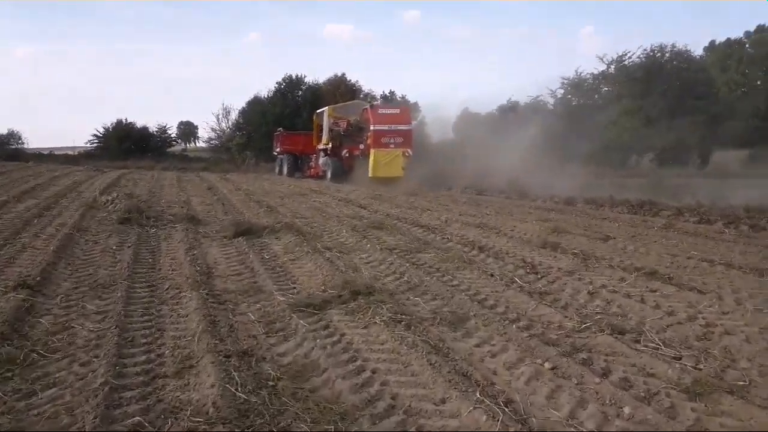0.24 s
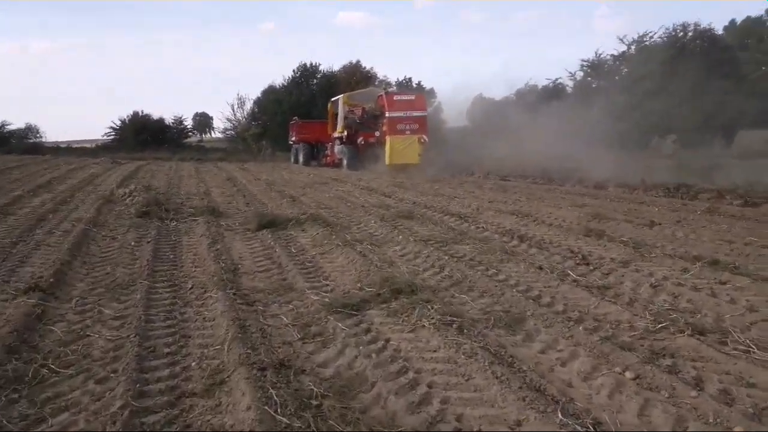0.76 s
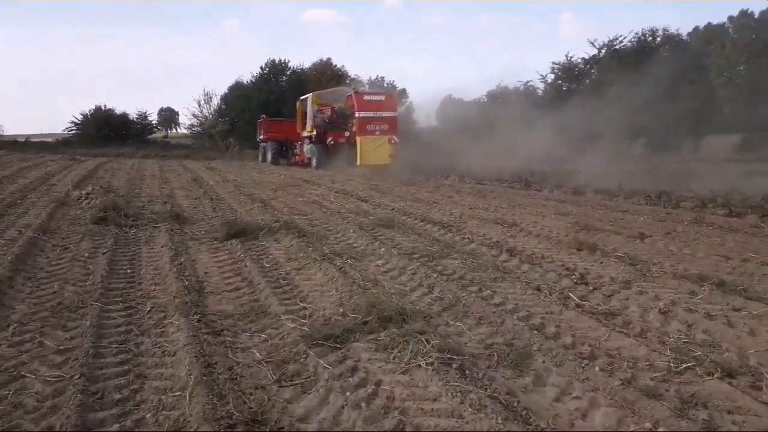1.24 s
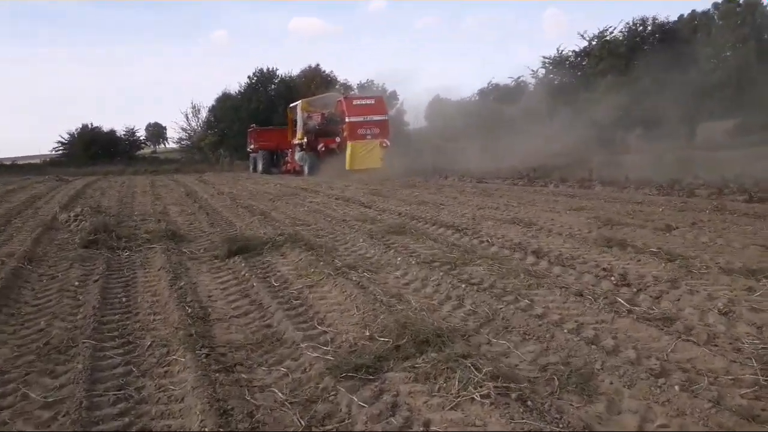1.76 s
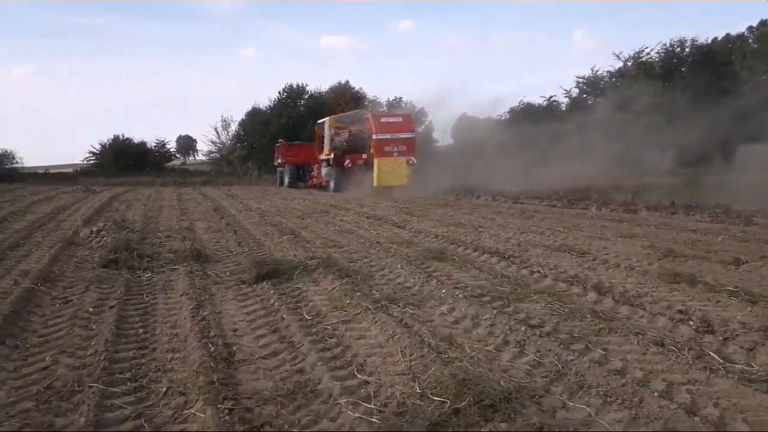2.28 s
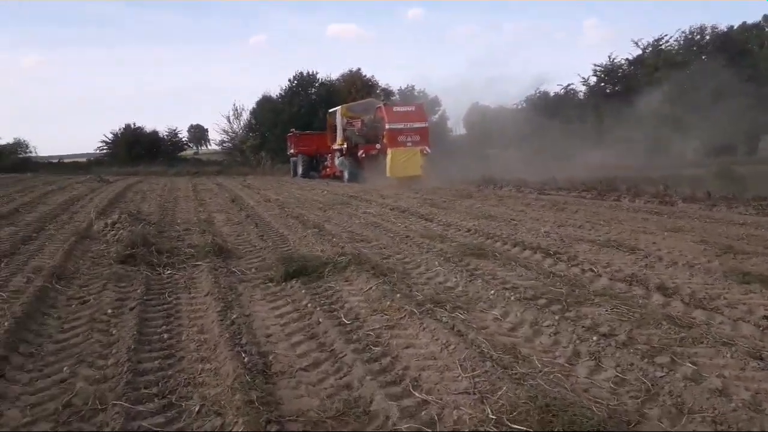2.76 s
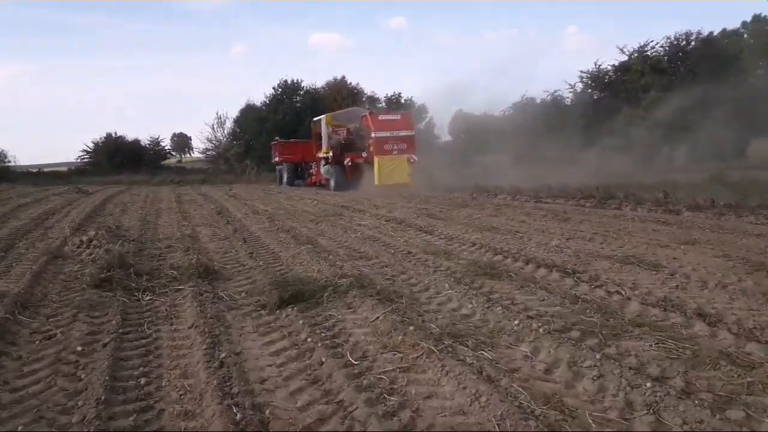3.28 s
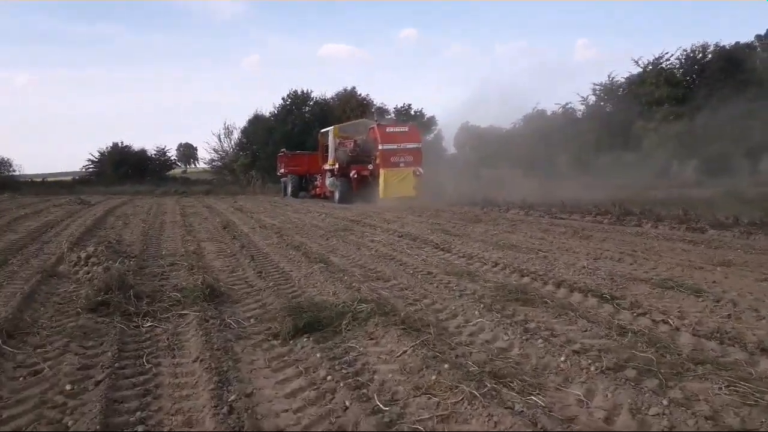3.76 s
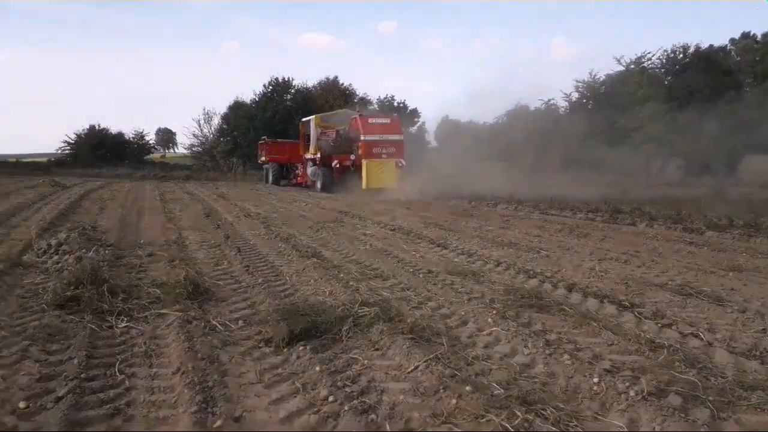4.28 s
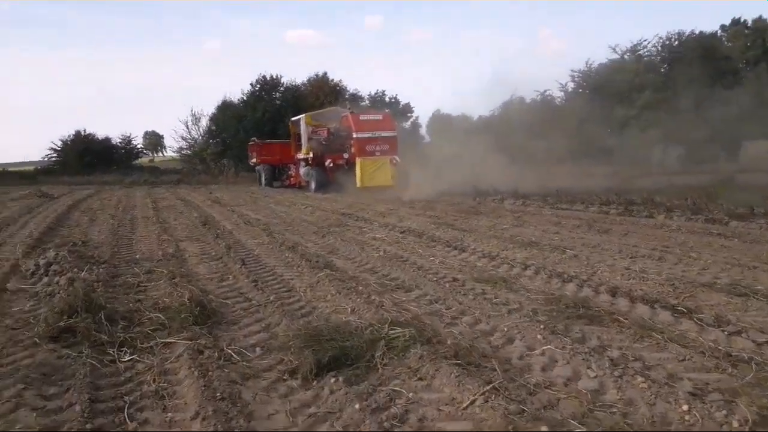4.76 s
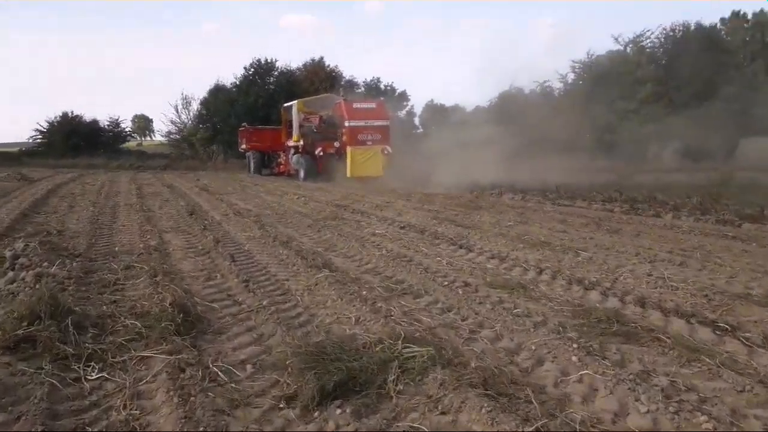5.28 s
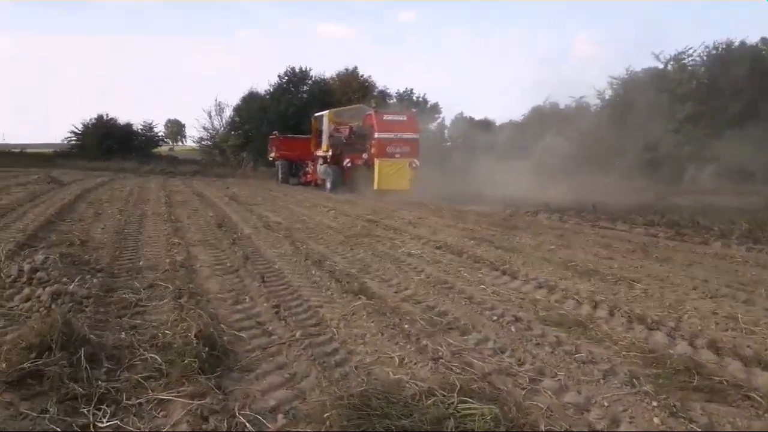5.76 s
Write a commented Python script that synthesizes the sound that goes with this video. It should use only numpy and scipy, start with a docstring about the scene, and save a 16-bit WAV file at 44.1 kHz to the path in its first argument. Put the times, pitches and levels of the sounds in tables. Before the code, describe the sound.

Steady metallic clatter and hissing soil from a harvester over a low engine drone, with stones crashing and irregular wind thumps on the microphone.

```python
"""A low engine drone and a steel rattle run throughout: a tractor pulls a potato harvester over a dry field.
The drone is shaped noise and unsteady tones; the rattle and hissing soil are random impacts and short rings.
Stones and clods crash through the frame, panels knock, a bar rings and a roller squeaks, from noise and modes.
Gusts of eddies thump on the microphone; dry straws rustle as high noise and a stalk snaps in brief rings."""
import sys
import numpy as np
from scipy import signal
from scipy.fft import rfft, irfft, next_fast_len
from scipy.io import wavfile
from scipy.ndimage import map_coordinates

SR = 44100
rng = np.random.default_rng(int(sys.argv[2]) if len(sys.argv) > 2 else 0)


def put_to_file(sound):
    """Save the sound as 16-bit audio at rate SR, in the file named by the first command-line argument."""
    columns = np.atleast_2d(sound).T  # one column per channel
    safe = np.clip(columns, -1, 1)
    whole_steps = np.round(safe * 32767)
    wavfile.write(sys.argv[1], SR, whole_steps.astype(np.int16))


N = 265614  # length in samples

# Strength of the wind between gusts: t/s, level/dB
BREEZE = [(0, -41), (.3, -53), (.55, -25), (.78, -24.5), (.9, -33.5), (1.45, -40.5), (1.7, -31.5),
          (2.4, -28.5), (2.7, -36), (3.05, -27), (3.45, -33.5), (3.75, -23), (4.3, -25.5), (4.62, -41),
          (4.8, -27.5), (4.95, -33.5), (5.8, -31.5), (6.02, -24.5)]
# Gusts, all rising and falling alike: peak t/s, hold/s, level/dB
GUSTS = [(0.44, 0.029, -16.5), (0.656, 0.018, -17.5), (1.559, 0.055, -23), (2.904, 0.053, -11.5),
         (3.59, 0.033, -9), (5.61, 0.021, -22.5)]
# Brief flurries within the wind: t/s, level/dB
FLURRIES = [(.415, -24.5), (.478, -15), (.558, -17.5), (.68, -24), (.782, -25), (1.035, -22.5),
            (1.568, -22), (1.612, -18), (1.665, -20), (2.29, -21.5), (2.83, -22.5), (2.915, -14),
            (3.0, -19.5), (3.045, -21), (3.62, -13), (3.685, -22.5), (3.881, -23), (3.95, -22.5),
            (4.035, -21), (4.095, -23), (4.17, -25), (4.21, -22), (4.27, -20), (4.312, -23), (4.375, -26.5),
            (4.446, -22.5), (4.485, -21.5), (4.53, -23), (4.665, -22), (4.695, -23), (4.73, -23.5),
            (5.065, -25), (5.655, -22)]
# Lone eddies that pop on the microphone: t/s, f/Hz, level/dB
POPS = [(.463, 225, -8), (.485, 170, -10), (0.664, 214, -8), (.728, 450, -13.5), (0.761, 219, -8),
        (1.04, 128, -13.5), (1.604, 370, -13), (1.675, 373, -10.5), (1.777, 231, -15.5), (1.885, 207, -11),
        (2.2, 194, -10.5), (2.828, 214, -14.5), (3.155, 173, -11.5), (3.608, 367, -2.5), (3.699, 460, -9.5),
        (3.785, 240, -9), (3.999, 188, -12.5), (4.089, 228, -12), (4.203, 149, -10.5), (4.279, 276, -13),
        (4.589, 159, -14.5), (5.273, 147, -17), (5.349, 247, -15), (5.614, 260, -9)]
# Colour of the large and the small eddies: f/Hz, level/dB per Hz
BIG_EDDY_SPECTRUM = [(20, -18), (40, -14), (65, -4), (95, 4), (160, 5.5), (250, -2.5), (400, -10),
                     (600, -17.5), (1000, -33), (3000, -83)]
SMALL_EDDY_SPECTRUM = [(80, -9), (200, 4), (350, 2.5), (520, -1.5), (700, -8), (1000, -16), (1500, -36),
                       (4000, -102)]
# Stubble rustling near the microphone: t/s, centre f/Hz, level/dB
RUSTLES = [(0.711, 11900, -56), (1.322, 12000, -57), (4.792, 13800, -53.5)]
# Dry stalks snapping near the microphone: t/s, level/dB
SNAPS = [(3.7377, -9), (5.9445, -31)]
# Resonances of a stalk: f/Hz, width/Hz, level/dB
STALK_MODES = [(1800, 1700, -12), (4200, 1600, -14), (6450, 1150, 1), (10700, 1600, -23),
               (13350, 1100, -11)]
# Engine and drive tones: mean f/Hz, mean level/dB
ENGINE_TONES = [(129, -45.5), (667, -49), (1122, -50)]
# Colour of the exhaust drone: f/Hz, level/dB per Hz
DRONE_SPECTRUM = [(25, -45), (45, -8.5), (65, 4), (130, 1), (250, 2), (340, -7), (450, -19.5), (700, -40.5),
                  (2000, -77)]
# Squeaks of a dry roller: t/s, length/s, f/Hz, level/dB, upper mode's level/dB
SQUEAKS = [(1.152, .072, 2065, -36, -15), (3.135, .16, 2050, -40, -24)]
# Blows that ring a steel bar: t/s, level/dB, f/Hz that the struck spot favours
BAR_BLOWS = [(.15, -44, 3300), (.585, -45, 3300), (1.887, -49, 3350), (1.98, -46, 3330), (2.97, -50, 3350),
             (3.625, -43.5, 3250), (4.985, -42, 2950), (5.055, -47, 3400)]
# Modes of the bar: f/Hz, level/dB, time to fall 60 dB/s
BAR_MODES = [(2589, -5, .22), (2907, 1, 1.3), (3200, -3, .4), (3338, -4, .35), (3440, 0, .22),
             (3798, -3, .25), (4237, 0, .5)]
# Single stones that knock a hollow panel: t/s, f/Hz, level/dB of that pitch, level/dB of the panel's ring
KNOCKS = [(.156, 1367, -19, -33), (1.524, 1520, -24, -39), (1.729, 1400, -21, -46), (1.759, 1300, -27, -45),
          (1.878, 744, -23, -35), (1.981, 1110, -16, -28.5), (1.996, 1230, -28, -33.5),
          (2.009, 1580, -16.5, -31.5), (2.198, 1740, -23, -35), (2.232, 1760, -20, -25),
          (2.303, 1430, -19, -41), (3.3, 1800, -20.5, -29), (3.325, 1330, -17, -30.5),
          (4.554, 1180, -28, -29), (4.561, 1250, -21, -25.5), (4.57, 1298, -17, -38.5),
          (5.429, 1128, -28, -31), (5.46, 732, -22, -40), (5.475, 1254, -17.5, -29.5)]
# Modes of the panel: f/Hz, level/dB, time to fall 60 dB/s
PANEL_MODES = [(715, -3, .11), (1285, -3, .06), (2030, -6, .08), (2300, -7, .08), (2940, -15, .07),
               (3300, -19, .06), (4170, -21, .08), (4900, -20, .08), (5945, -18, .08)]
# Colour of a stone's contact with the panel: f/Hz, level/dB per Hz
CONTACT_SPECTRUM = [(400, -14), (750, -1), (1300, 0), (2200, -4), (2700, -13), (4000, -15), (6000, -10),
                    (7300, -16), (8500, -45)]
# Stones and clods tumbling through the machine: t/s, length/s, stones' level/dB, earth's level/dB
CRASHES = [(0.086, 0.033, -29.5, -63), (0.141, 0.027, -30.5, -38.5), (0.572, 0.046, -23, -39.5),
           (1.028, 0.024, -32, -63), (1.314, 0.038, -57, -42.5), (1.413, 0.012, -32, -50),
           (1.508, 0.034, -27.5, -45), (1.726, 0.015, -27.5, -54), (1.867, 0.048, -23.5, -41),
           (1.971, 0.044, -23.5, -36), (2.189, 0.061, -22, -32.5), (2.287, 0.044, -28, -38),
           (2.456, 0.13, -31.5, -49), (2.616, 0.057, -37, -46), (3.294, 0.054, -24, -41.5),
           (3.797, 0.055, -22.5, -33.5), (4.55, 0.015, -28.5, -57), (4.707, 0.028, -30.5, -50),
           (4.748, 0.055, -31, -53), (4.863, 0.012, -44, -42), (4.979, 0.055, -26.5, -48),
           (5.042, 0.058, -29, -47), (5.424, 0.044, -25, -39.5), (5.59, 0.0084, -35, -68)]
# Colour of the battered frame, the spraying grit and the earth's thud: f/Hz, level/dB per Hz
FRAME_SPECTRUM = [(250, -31), (480, -12.5), (620, -3), (780, -1.5), (930, -7), (1130, 0.5), (1400, 1),
                  (1750, -2.5), (2200, -11.5), (2600, -24.5), (3300, -33), (4000, -30.5), (7000, -20.5),
                  (9000, -73)]
GRIT_SPECTRUM = [(1500, -61), (3000, -3.5), (4200, -10), (5300, -1.5), (6500, 6), (7200, 5), (8200, -16),
                 (9500, -24), (11500, -25), (13000, -63), (16000, -48)]
THUD_SPECTRUM = [(30, -58), (70, -36), (120, 5.5), (180, 4), (300, -1), (450, -13.5), (1000, -88)]
# How hard the sieve web rattles under its load: t/s, level/dB
WEB_LOAD = [(0.0, -37.5), (0.35, -31.5), (1.39, -34.5), (1.83, -31.5), (2.09, -31.5), (3.0, -32),
            (3.92, -28.5), (4.54, -31.5), (5.21, -32.5), (6.02, -31.5)]
# Soil that the web tips out once a lap, lap by lap: level/dB
LAP_SPILLS = [-38.5, -41.5, -47, -47.5, -42]
# Colour of the web's rods and of the soil: f/Hz, level/dB per Hz
WEB_SPECTRUM = [(250, -9.5), (480, -15), (650, -4.5), (800, -5.5), (930, -9.5), (1130, -4), (1400, -3),
                (1800, -9.5), (2150, -15.5), (2600, -25), (3200, -27), (4000, -33.5), (7000, -26.5),
                (9000, -65)]
SOIL_SPECTRUM = [(1500, 5.5), (3000, -11), (4200, -11), (5300, -3), (6500, 0.5), (7200, -3.5),
                 (8100, -20.5), (9000, -17.5), (11000, -14), (12300, -22.5), (14500, -37), (16000, -35)]

FLUTTER_DB, FLUTTER_PER_S = .9, 14  # unsteadiness of the breeze
GUST_RISE_DB_PER_S, GUST_FALL_DB_PER_S = 236, 141
FLURRY_S = .016  # half width of a flurry
POP_CYCLES, POP_CALM_CYCLES = 0.57, 1.4  # half widths of a pop and of the lull around it
SNAP_SWELL_S = .00055  # from the start of a snap to its peak
UPPER_MODE = 1.31  # multiple of the roller's pitch
BAR_BUZZ_RAD = .28  # the loose bar chatters in its seat, which roughens its ring
SPOT_DB, SPOT_HZ = 9, 500  # modes this far or farther from the favoured pitch are this much weaker
CONTACT_DB, CONTACT_T60_S = -5, .08  # level relative to the panel's ring, and time to fall 60 dB
PANEL_RISE_S = .0012  # the ring takes a moment to spread over the panel
THUD_DB, FULL_LOAD_S = 11, 0.045  # thud relative to the earth's spray; shorter loads thud less
RATTLE_DB, TRICKLE_DB = -1, -21.5  # rods and steady trickle of soil, relative to the load
FIRST_SPILL_S, LAP_S = -0.42, 1.412
SPILL_RISE_S, SPILL_HOLD_S, SPILL_T60_S = 0.07, 0.34, 1.54
SPILL_RATTLE_DB = 2.5  # extra rattle of the rods, relative to the spill
LOW_CUT_HZ, TOP_HZ = 34, 15700  # the band that the microphone passes


def amp(db):
    """Turn decibels into a gain."""
    return np.exp(np.maximum(db, -300) * (np.log(10) / 20))


def unit(x):
    """Scale to rms 1."""
    return x / np.sqrt(np.mean(x ** 2) + 1e-20)


def clock():
    """The time of each sample in seconds."""
    return np.arange(N) / SR


def curves(rows):
    """Join the points of each column after the time by straight lines."""
    s, *columns = np.transpose(rows)
    return [np.interp(clock(), s, column) for column in columns]


def wobble(rate):
    """A smooth random curve with this many random points a second."""
    return map_coordinates(rng.standard_normal(4096), [clock() * rate], mode="wrap")


def filtered(x, response):
    """Multiply the spectrum of x by a response that depends on frequency."""
    size = next_fast_len(N + SR // 2)
    hz = np.fft.rfftfreq(size, 1 / SR)
    return irfft(rfft(x, size) * response(hz), size)[:N]


def coloured(x, spectrum):
    """Shape x by a table of frequencies and levels, at rms 1."""
    f, db = np.transpose(spectrum)
    return unit(filtered(x, lambda hz: amp(np.interp(np.log(hz + 1), np.log(f), db))))


def rush(spectrum):
    """Coloured noise of rms 1."""
    return coloured(rng.standard_normal(N), spectrum)


def contacts(rate, spread_db):
    """Random impacts of unequal size, rate a second on average."""
    chance, size, sign = rng.random(N), rng.standard_normal(N), rng.choice([-1, 1], N)
    struck = chance < rate / SR
    return unit(struck * sign * amp(spread_db * np.clip(size, -2, 2)))


def ringing(x, t60, ring_db):
    """Each impact is a crack and a dying noisy ring, new each time as it strikes another spot."""
    keep = amp(-60 / (t60 * SR)) ** 2  # share of the energy left after one sample
    energy = signal.lfilter([1 - keep], [1, -keep], x ** 2)
    return unit(x + amp(ring_db) * np.sqrt(energy) * rng.standard_normal(N))


def clinks(rate, centre_hz, scatter, t60, spread_db):
    """Short steel rings at random times, each with its own pitch and size."""
    when, pitch, size = rng.standard_normal((4096, 3)).T[:, :, None]
    start = np.abs(np.arange(len(when))[:, None] + 3 * when) / rate
    heard = start[:, 0] < N / SR
    t = np.arange(SR // 20) / SR
    hz = centre_hz * np.exp(scatter * pitch[heard])
    loudness = amp(spread_db * np.clip(size[heard], -2, 2))
    rings = loudness * amp(-60 * t / t60) * np.sin(2 * np.pi * hz * t)
    at = (start[heard] * SR).astype(int) + np.arange(len(t))
    return unit(np.bincount(at.ravel(), rings.ravel(), N)[:N])


def tumble(start, length, rise, t60):
    """The strength of a load that lands, keeps tumbling for a while, then settles."""
    t = clock() - start
    live = (t > 0) & (t < length + t60)
    landing = np.minimum(t[live] / rise, 1)
    settling = amp(-60 * np.maximum(t[live] - length, 0) / t60)
    out = np.zeros(N)
    out[live] = landing * settling
    return out


def gust(peak, hold):
    """A gust builds quickly, holds a moment and dies away more slowly."""
    t = clock() - peak
    return amp(GUST_RISE_DB_PER_S * np.minimum(t, 0) - GUST_FALL_DB_PER_S * np.maximum(t - hold, 0))


def eddies(spectrum, rate, spread_db, wash_db):
    """Separate pressure thumps at uneven intervals, on a turbulent wash."""
    slip, size, sign = rng.standard_normal((4096, 3)).T
    at = ((np.arange(len(slip)) + 0.3535 * slip) / rate * SR).astype(int)
    inside = (at >= 0) & (at < N)
    push = np.sign(sign) * amp(spread_db * np.clip(size, -2, 2))
    thumps = np.bincount(at[inside], push[inside], N)
    # the low part of each thump arrives a little late, so the pressure swings to and fro
    swung = filtered(unit(thumps), lambda hz: ((1 - 1j * hz / 220) / (1 + 1j * hz / 220)) ** 2)
    return coloured(swung + amp(wash_db) * rng.standard_normal(N), spectrum)


def wind():
    """Eddies buffet the microphone; strong gusts put their extra force into smaller, faster ones."""
    wind_db, = curves(BREEZE)
    breeze = amp(wind_db + FLUTTER_DB * wobble(FLUTTER_PER_S))
    gust_energy = sum((amp(db) * gust(s, hold)) ** 2 for s, hold, db in GUSTS)
    flurry_energy = sum(amp(db) ** 2 * np.exp(-((clock() - s) / FLURRY_S) ** 2) for s, db in FLURRIES)
    force = np.sqrt(breeze ** 2 + gust_energy + flurry_energy)
    fast = force / np.hypot(force, amp(-13.5))  # share of the small eddies
    slow = np.sqrt(1 - fast ** 2)
    big = eddies(BIG_EDDY_SPECTRUM, rate=85, spread_db=1.3, wash_db=-3)
    small = eddies(SMALL_EDDY_SPECTRUM, rate=210, spread_db=1.3, wash_db=-2)
    return force * (amp(-0.5) * slow * big + amp(-2.5) * fast * small)


def pops(turbulence):
    """A lone eddy pushes the turbulence aside and swings the pressure once; smaller ones sound higher."""
    out, t = turbulence.copy(), clock()
    for s, hz, db in POPS:
        near = np.abs(t - s) < 10 / hz
        cycles = (t[near] - s) * hz
        out[near] *= 1 - np.exp(-(cycles / POP_CALM_CYCLES) ** 2)
        out[near] += amp(db) * np.exp(-(cycles / POP_CYCLES) ** 2) * np.sin(2 * np.pi * cycles)
    return out


def rustles():
    """Dry straws brush each other in a short, very high hiss."""
    out = np.zeros(N)
    for s, hz, db in RUSTLES:
        hiss = rush([(.75 * hz, -40), (.95 * hz, 0), (1.05 * hz, 0), (1.2 * hz, -40)])
        out += amp(db) * tumble(s, length=.016, rise=.006, t60=0.13) * hiss
    return out


def snaps():
    """Fibres give way in a moment and ring the stalk's resonances; the wider one is, the shorter it sounds."""
    out, t = np.zeros(N), np.arange(SR // 100) / SR - SNAP_SWELL_S
    crack = np.zeros(len(t))
    for hz, width, db in STALK_MODES:
        swell = 1 / np.cosh(2 * np.pi * width * t / np.sqrt(2))
        crack += amp(db) * swell * np.sin(2 * np.pi * hz * t)
    for s, db in SNAPS:
        out[round(s * SR):][:len(t)] += amp(db) * crack
    return out


def engine():
    """A low exhaust drone of noise and a few slightly unsteady tones that share one speed."""
    speed = 1 + 0.0067 * wobble(3.3) + 0.00546 * wobble(25)
    turns = np.cumsum(speed) / SR
    tones = np.zeros(N)
    for hz, db in ENGINE_TONES:
        tones += amp(db + 0.57 * wobble(1.8)) * np.sqrt(2) * np.sin(2 * np.pi * hz * turns)
    return tones + amp(-35.0) * rush(DRONE_SPECTRUM)


def squeaks():
    """Short, scraping squeals swell and fade on the roller's two modes, roughened by random wobbles."""
    out, t = np.zeros(N), clock()
    for s, length, hz, db, upper_db in SQUEAKS:
        swell = np.abs(np.sin(np.pi * np.clip((t - s) / length, 0, 1))) ** .7
        phase = 2 * np.pi * hz * t
        lower = np.sin(phase + .9 * wobble(330))
        upper = amp(upper_db) * np.sin(UPPER_MODE * phase + .3 * wobble(330))
        out += amp(db) * swell * unit(amp(1.5 * wobble(300)) * (lower + upper))
    return out


def clangs():
    """A struck bar rings with a slight buzz; the spot that is hit decides which modes speak most."""
    out, t = np.zeros(N + SR), np.arange(SR) / SR
    for hz, level, t60 in BAR_MODES:
        buzz = np.pad(BAR_BUZZ_RAD * wobble(140), (0, SR))
        for s, db, spot in BAR_BLOWS:
            at = round(s * SR)
            off_db = -SPOT_DB * min(abs(hz - spot) / SPOT_HZ, 1)
            start_db = db + level + off_db + rng.normal(0, 1)
            ring = np.sin(2 * np.pi * hz * t + buzz[at:at + SR])
            out[at:at + SR] += amp(start_db - 60 * t / t60) * ring
    return out[:N]


def knocks():
    """A stone cracks against a panel: the struck spot gives a brief, rough note and the whole panel rings."""
    out, t = np.zeros(N + SR), np.arange(SR // 5) / SR
    contact = rush(CONTACT_SPECTRUM)
    spreading = 1 - np.exp(-t / PANEL_RISE_S)
    for s, hz, db, panel_db in KNOCKS:
        phase = 2 * np.pi * np.cumsum(hz * (1 + .035 * wobble(700))) / SR
        out[:N] += amp(db) * tumble(s, length=.0023, rise=.0012, t60=.07) * np.sin(phase)
        crack = tumble(s, length=.005, rise=.003, t60=CONTACT_T60_S) * contact
        out[:N] += amp(panel_db + CONTACT_DB) * crack
        for mode_hz, level, t60 in PANEL_MODES:
            size_db, detune = rng.normal(0, [2, .012])  # every knock rings a little differently
            fading = amp(panel_db + level + size_db - 60 * t / t60)
            ring = fading * np.sin(2 * np.pi * mode_hz * (1 + detune) * t)
            out[round(s * SR):][:len(t)] += spreading * ring
    return out[:N]


def crashes():
    """Stones batter the sheet-steel frame and rods jangle; earth sprays as grit and thuds."""
    frame, grit, thud = np.zeros((3, N))
    for s, length, stones_db, earth_db in CRASHES:
        weight = min(length / FULL_LOAD_S, 1) ** 2
        # short loads of stones and grit also settle sooner
        frame += amp(stones_db) * tumble(s, length, rise=0.0071, t60=9.1 * length)
        grit += amp(earth_db) * tumble(s, length / 2, rise=0.0071, t60=4.3 * length)
        thud += amp(earth_db + THUD_DB) * weight * tumble(s, length / 2, rise=0.0049, t60=0.45)
    blows = coloured(ringing(contacts(rate=900, spread_db=1.5), t60=.085, ring_db=4), FRAME_SPECTRUM)
    panels = clinks(rate=260, centre_hz=1400, scatter=.4, t60=.09, spread_db=2)
    panels = coloured(panels, FRAME_SPECTRUM)
    jangle = clinks(rate=300, centre_hz=2600, scatter=.2, t60=.11, spread_db=2)
    steel = unit(blows + amp(-2) * panels + amp(-19) * jangle)
    spray = coloured(ringing(contacts(rate=2400, spread_db=3.5), t60=.035, ring_db=0), GRIT_SPECTRUM)
    return amp(-0.35) * frame * steel + grit * spray + thud * rush(THUD_SPECTRUM)


def sieve():
    """Steel rods chatter and clink over the rollers; soil trickles between them and spills off once a lap."""
    load_db, = curves(WEB_LOAD)
    spill = np.zeros(N)
    for lap, db in enumerate(LAP_SPILLS):
        start = FIRST_SPILL_S + lap * LAP_S
        spill += amp(db) * tumble(start, SPILL_HOLD_S, SPILL_RISE_S, SPILL_T60_S)
    web = np.hypot(amp(load_db + RATTLE_DB), amp(SPILL_RATTLE_DB) * spill)
    soil = np.hypot(amp(load_db + TRICKLE_DB), spill)
    chatter = coloured(ringing(contacts(rate=800, spread_db=4), t60=.08, ring_db=1.5), WEB_SPECTRUM)
    clinking = clinks(rate=150, centre_hz=1450, scatter=.33, t60=.12, spread_db=3)
    clinking = coloured(clinking, WEB_SPECTRUM)
    rods = unit(chatter + amp(-5.0) * clinking)
    crumbs = coloured(contacts(rate=6000, spread_db=3.5), SOIL_SPECTRUM)
    shake_db = .6 * wobble(24) + .7 * wobble(9)  # sways rods and soil together
    trickle_db = wobble(44)
    return amp(shake_db) * (web * rods + soil * amp(trickle_db) * crumbs)


def scene():
    """Add the air and stubble at the microphone to the distant machine."""
    nearby = pops(wind()) + rustles() + snaps()
    machine = engine() + squeaks() + clangs() + knocks() + crashes() + sieve()
    return (nearby + machine)[None]


def record(dry):
    """The microphone rounds off the strongest thumps, then loses the deepest rumble and the highest treble."""
    rounded = dry[0] / (1 + (dry[0] / .9) ** 8) ** .125
    return filtered(rounded, lambda hz: hz ** 4 / (hz ** 4 + LOW_CUT_HZ ** 4) * (hz < TOP_HZ))[None]


dry = scene()
out = record(dry)
put_to_file(out)
```